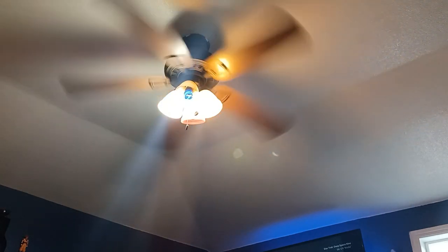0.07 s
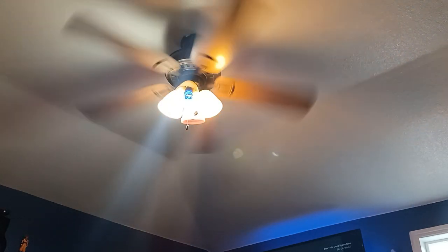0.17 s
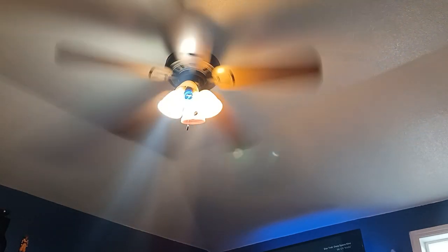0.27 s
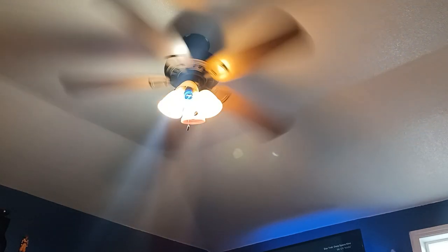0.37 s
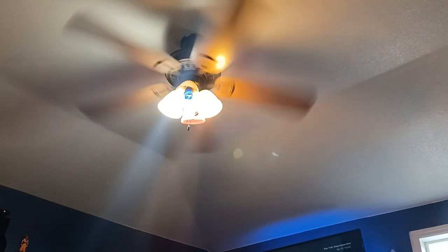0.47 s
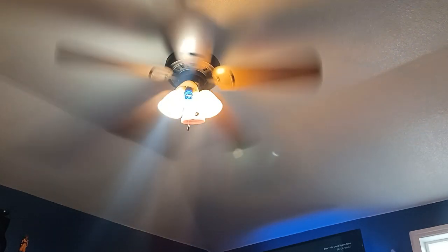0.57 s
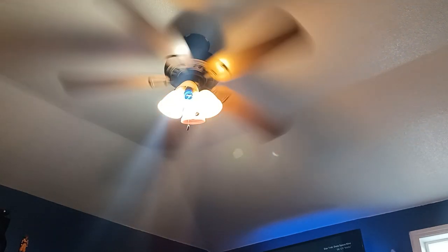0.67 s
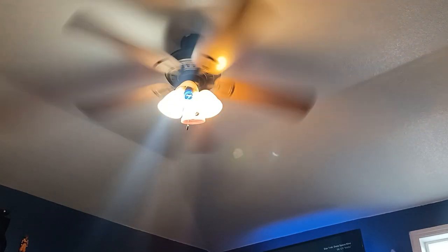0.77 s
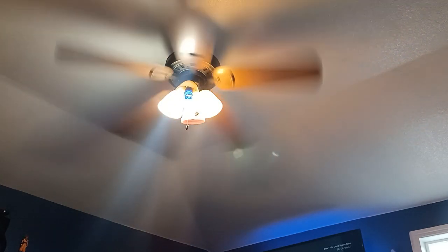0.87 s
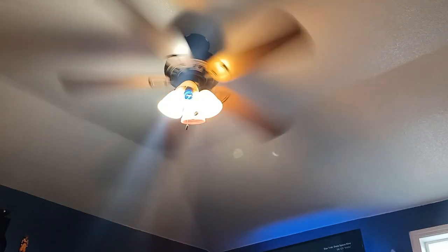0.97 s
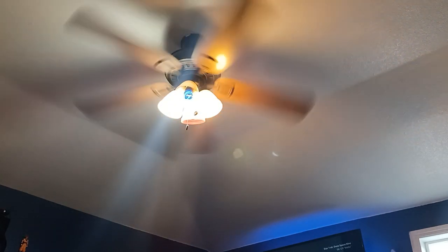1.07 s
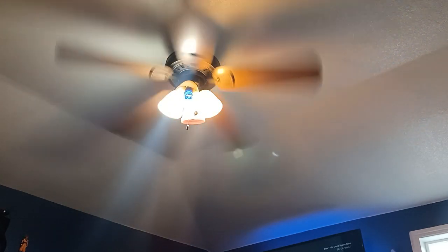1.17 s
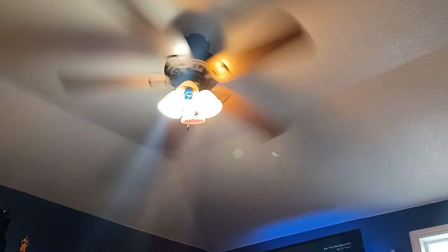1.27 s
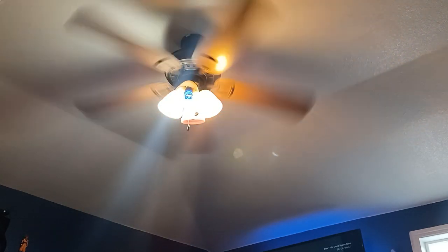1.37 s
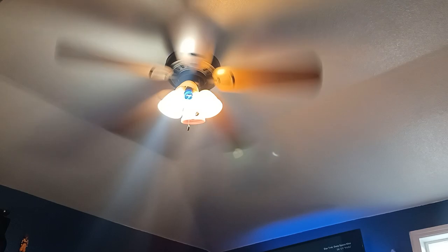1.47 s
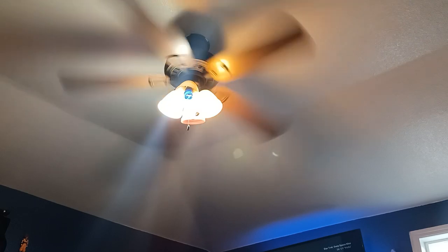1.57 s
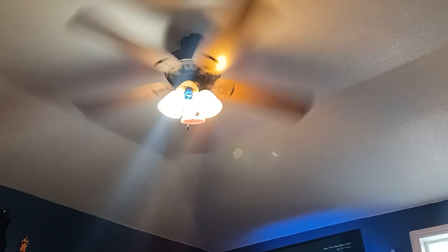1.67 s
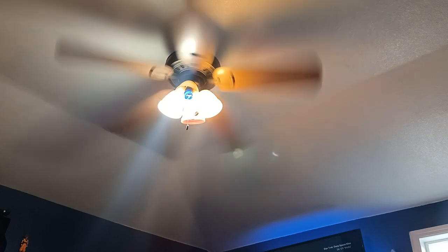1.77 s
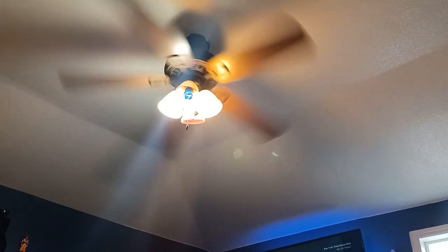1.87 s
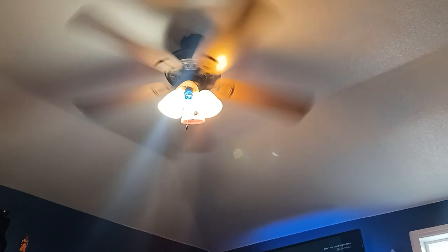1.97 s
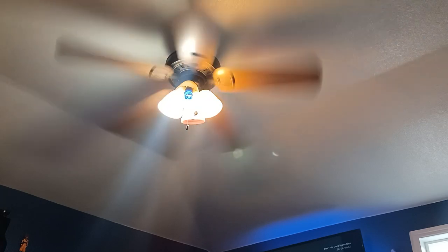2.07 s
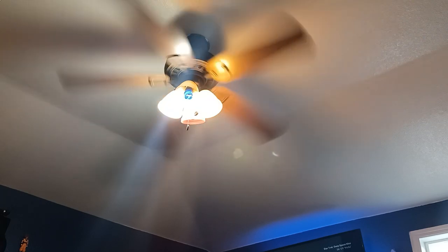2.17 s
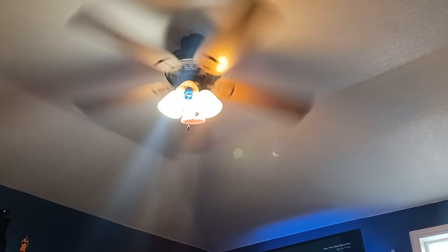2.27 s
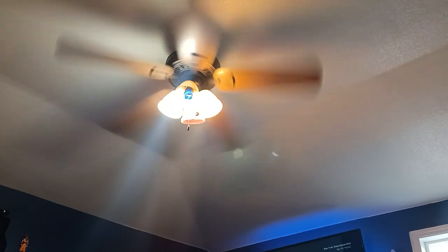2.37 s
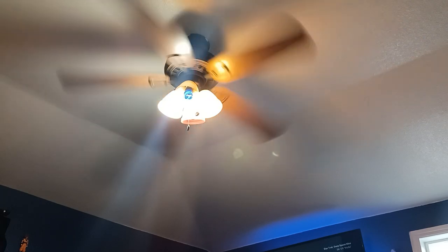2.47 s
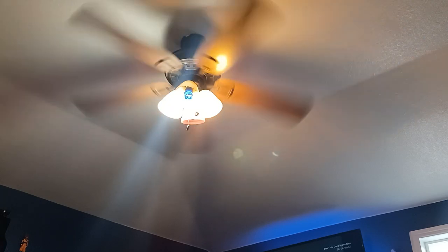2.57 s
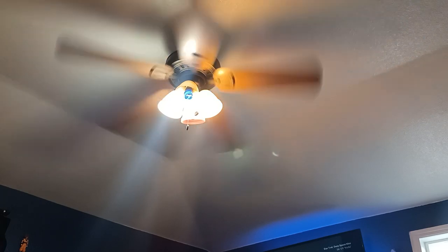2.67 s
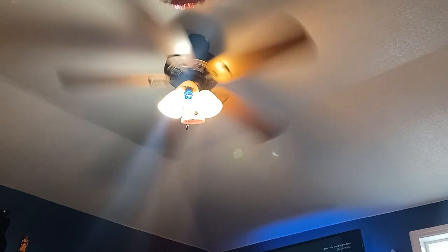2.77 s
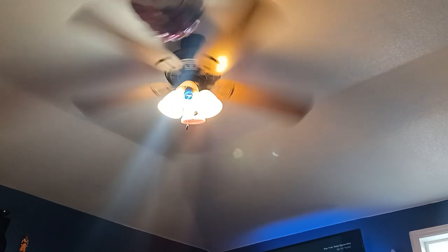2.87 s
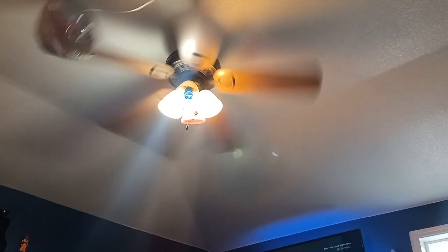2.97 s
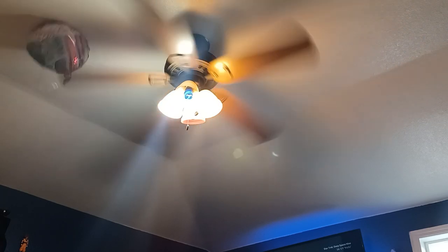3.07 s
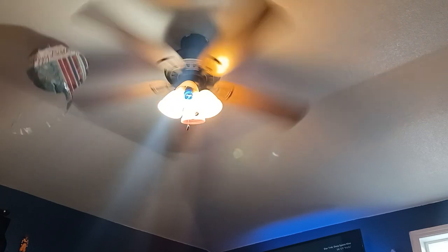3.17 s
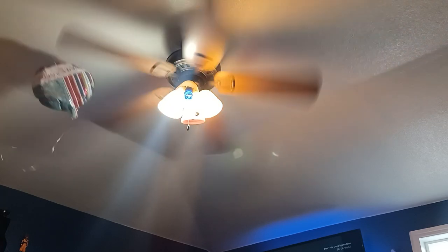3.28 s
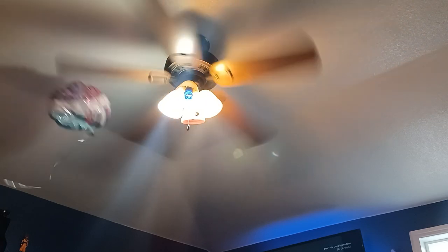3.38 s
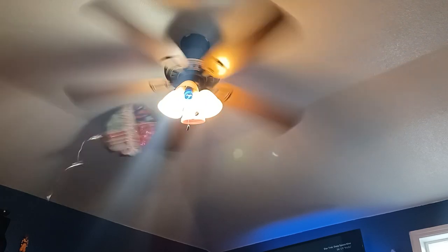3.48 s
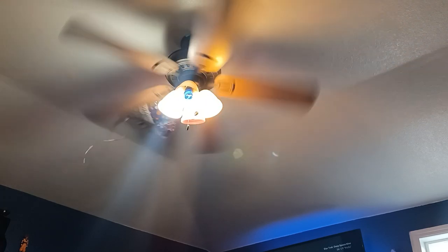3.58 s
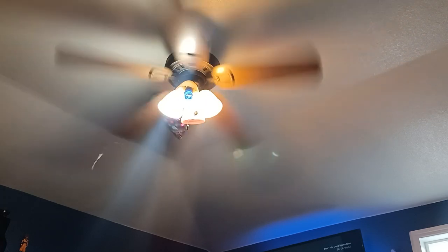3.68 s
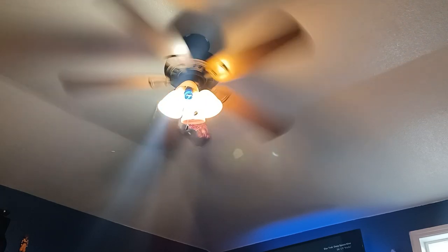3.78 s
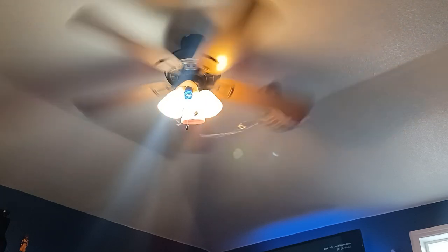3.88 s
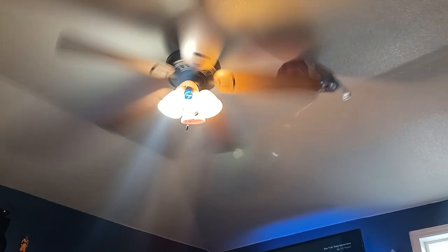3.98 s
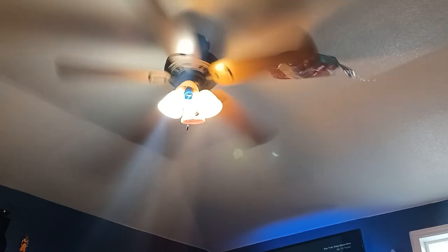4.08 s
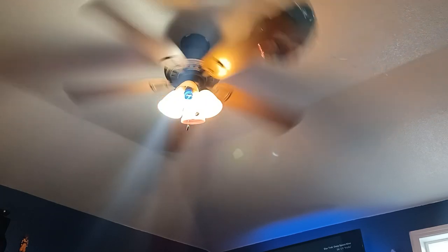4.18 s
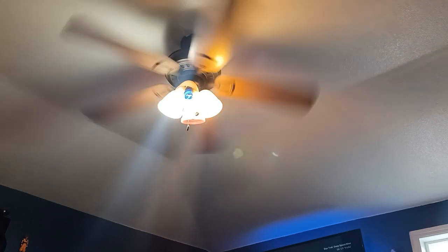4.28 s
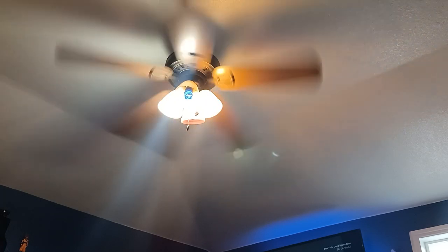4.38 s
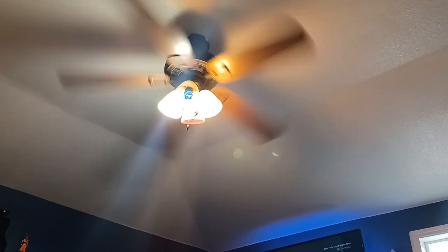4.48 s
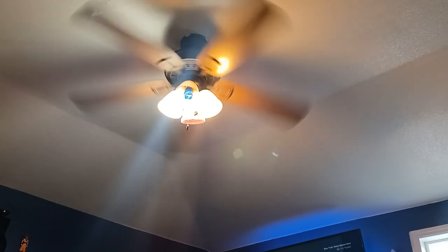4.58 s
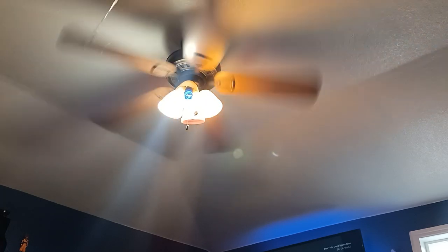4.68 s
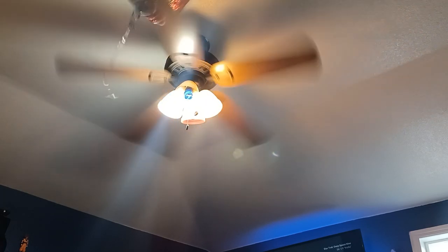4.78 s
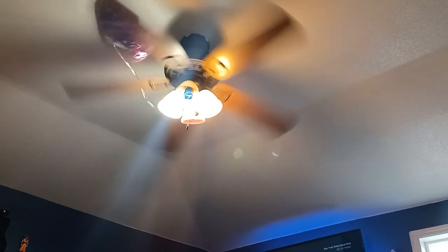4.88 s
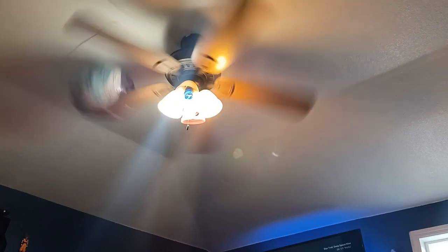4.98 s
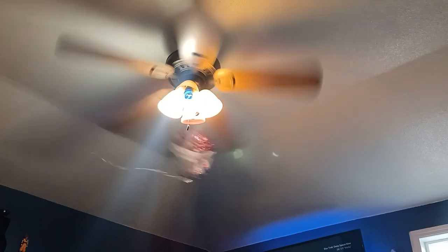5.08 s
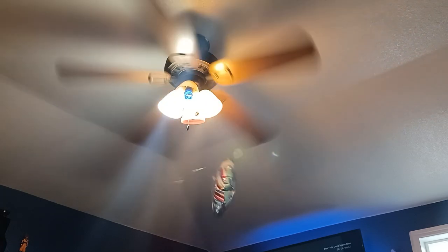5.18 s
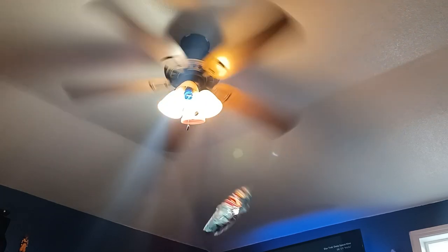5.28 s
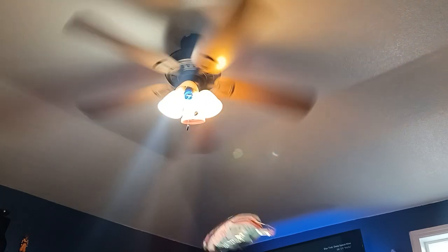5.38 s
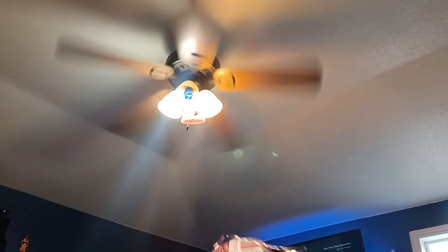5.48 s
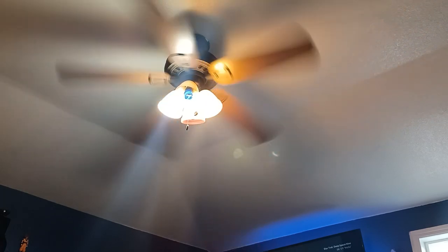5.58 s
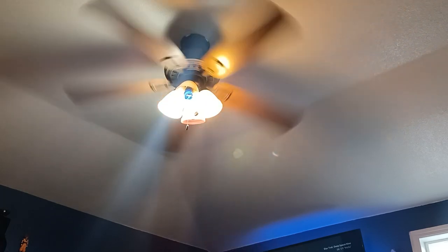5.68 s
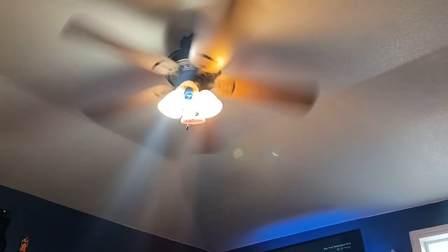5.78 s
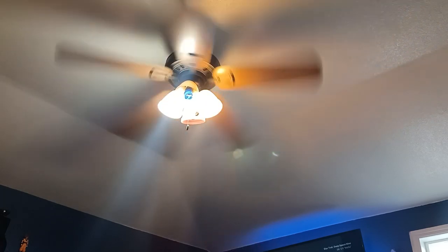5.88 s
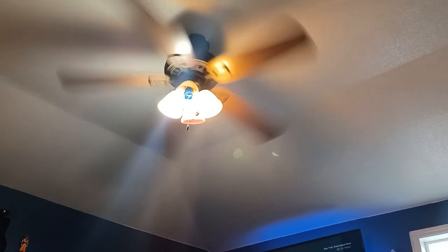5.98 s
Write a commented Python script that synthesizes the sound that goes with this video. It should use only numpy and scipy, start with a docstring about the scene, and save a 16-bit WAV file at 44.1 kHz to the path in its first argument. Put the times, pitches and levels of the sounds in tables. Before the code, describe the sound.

In a bedroom, a foil balloon is handled close to the microphone with soft bumps, light crinkles and small ticks. Just before three seconds the spinning ceiling fan hits it: loud papery smacks with bright crackle and a hollow drum-like ring, in irregular clusters until about five seconds. A last rustle fades, leaving barely audible fan hum and air. The stereo is wide, with a short room echo.

```python
"""A foil balloon rustles as it is handled, then drifts into a spinning ceiling fan in a bedroom.
Each blow, by hand or blade, shakes the skin, sets off a burst of random foil crackle and rings the
resonant modes of the gas cushion. Single creases snap as short rings with bright ticks; dull bumps
are sagging tones in low noise. The motor hums faintly as a tone with narrow noise bands over a rush
of air, and the room answers the balloon with half a second of decaying noise."""
import sys
import numpy as np
from scipy import signal
from scipy.fft import rfft, irfft
from scipy.io import wavfile

SR = 44100
rng = np.random.default_rng(int(sys.argv[2]) if len(sys.argv) > 2 else 0)


def log_audio(samples):
    """Write samples as a 16-bit WAV file to the path given in sys.argv[1]."""
    # one column per channel
    frames = np.atleast_2d(samples).T
    # limit to full scale, then quantise
    limited = np.clip(frames, -1, 1)
    pcm = np.round(limited * 32767).astype(np.int16)
    wavfile.write(sys.argv[1], SR, pcm)


def to_linear_factor(level_db):
    """Convert decibel levels (scalar or array-like) to linear amplitude factors."""
    exponent = np.asarray(level_db, float) / 20
    return 10 ** exponent


N = 266672

# spectrum of creasing foil: (frequency [Hz], density [dB per Hz])
CREASING_FOIL = [(1060, -20.5), (1800, -5.5), (1940, -8.5), (2350, -10), (3030, -12), (5750, -14),
                 (6900, -16.5), (7910, -24.5), (13200, -13.5), (15000, -17), (16000, -53)]
# the balloon is let go near the microphones and rises to the ceiling:
# (time [s], echo send re direct sound [dB], delay of the left microphone [ms])
BALLOON_DISTANCE = [(0, -6, 0.46), (2.2, -2, .3), (2.7, 0.5, 0.17), (4.5, 0, .15), (5.6, -9.5, 0.031)]


def rms_one(x):
    """Normalization: scale to unit mean power."""
    return x / np.sqrt(np.mean(x ** 2) + 1e-20)


def in_time(rows):
    """Linear interpolation: table columns become curves over all samples."""
    times, *columns = np.transpose(rows)
    return [np.interp(np.arange(N) / SR, times, column) for column in columns]


def sides(pan_db):
    """Intensity stereo: left and right gains for a level difference, positive to the left."""
    return to_linear_factor(np.array([[pan_db / 2], [-pan_db / 2]]))


def filtered(x, order, hz, kind):
    """Butterworth filtering: a maximally flat passband."""
    return signal.sosfilt(signal.butter(order, hz, kind, fs=SR, output="sos"), x)


def colour(x, spectrum):
    """Minimum-phase filtering: folding the cepstrum makes a given spectrum causal."""
    table_hz, table_db = np.transpose(spectrum)
    hz = np.maximum(np.fft.rfftfreq(4096, 1 / SR), 10)
    db = np.interp(np.log(hz), np.log(table_hz), table_db)
    cepstrum = irfft(np.log(to_linear_factor(db)))
    cepstrum[1:2048] *= 2
    cepstrum[2049:] = 0
    impulse = irfft(np.exp(rfft(cepstrum)))
    return signal.fftconvolve(x, np.atleast_2d(impulse), axes=1)[:, :N]


def ring(x, hz, t60):
    """Damped resonance: a unit click sets a decaying sine of height 1 ringing."""
    radius = to_linear_factor(-60 / (t60 * SR))
    angle = 2 * np.pi * hz / SR
    return signal.lfilter([0, np.sin(angle)], [1, -2 * radius * np.cos(angle), radius ** 2], x + 1e-18)


def alike_pair(white, alike):
    """Interchannel coherence: left and right from a shared and an opposed noise."""
    alike = np.clip(alike, 0, 1)
    shared = np.sqrt(.5 + alike / 2) * white[0]
    opposed = np.sqrt(.5 - alike / 2) * white[1]
    return shared + opposed * [[1], [-1]]


def fan():
    """Tonal and broadband noise: a steady mains tone and wavering bands over the low rush of air."""
    # motor bands: (frequency [Hz], rms level re the tone [dB], width [Hz])
    motor_bands = [(233.2, -1.5, 2.6), (329, -19.5, 22)]
    # stirred air: (frequency [Hz], density [dB per Hz])
    air_spectrum = [(30, -26.5), (70, -13), (170, -8), (230, -4.5), (400, -10.5), (650, -20.5),
                    (1000, -20.5), (2000, -29.5), (2800, -43), (6400, -35.5), (8000, -43), (15200, -44.5),
                    (16200, -74.5)]
    # the hum sinks while the blows last and all of it fades at the end:
    # (time [s], hum gain [dB], air gain [dB])
    fan_levels = [(0, -57, -55.5), (1.0, -59, -60), (2.8, -60, -54.5), (3.2, -68, -54.5), (5.3, -63.5, -57),
                  (5.6, -68.5, -65), (6.05, -68, -71)]
    mains_hz, split_hz, treble_gain_db = 121, 700, -2.5
    hum_db, air_db = in_time(fan_levels)

    white = rng.standard_normal((len(motor_bands), N + SR))   # the first second lets the bands build up
    tone = np.sqrt(2) * np.sin(2 * np.pi * mains_hz * np.arange(N) / SR)
    bands = sum(to_linear_factor(db) * rms_one(ring(noise, hz, 2 / width)[SR:])
                for noise, (hz, db, width) in zip(white, motor_bands))
    hum = (tone + bands) * sides(-3.0)

    low = colour(rng.standard_normal((2, N)), air_spectrum)
    high = colour(rng.standard_normal((2, N)), air_spectrum)
    low = filtered(alike_pair(low, 0.29), 2, split_hz, "low")
    high = filtered(alike_pair(high, 0.21), 2, split_hz, "high")
    air = (low + to_linear_factor(treble_gain_db) * high) / np.std(low)
    return to_linear_factor(hum_db) * hum + to_linear_factor(air_db) * air


def echo_tail():
    """Diffuse reverberation: noise dying band by band, alike in the bass and unrelated in the treble."""
    # (frequency [Hz], t60 [s], left-right likeness, left-right level difference [dB])
    room_bands = [(101, 0.43, 0.81, -5), (292, 0.18, 0.9, -3.5), (900, 0.31, 0.21, 4),
                  (2417, 0.4, 0.088, 3.5), (7040, 0.45, 0.081, -3), (14000, 0.33, 0.054, -2.5)]
    first_echo_s = 0.0057   # silent until then, full after twice that time
    t, tail = np.arange(SR // 2) / SR, 0
    hz = [row[0] for row in room_bands]
    edges = [20, *np.sqrt(np.multiply(hz[1:], hz[:-1])), 19000]
    for low, high, (_, t60, alike, pan_db) in zip(edges, edges[1:], room_bands):
        white = rng.standard_normal((2, len(t)))
        band = filtered(white, 2, [low, high], "band")
        band = alike_pair(band, alike) * sides(pan_db)
        equal_energy = np.sqrt(t60 * SR / np.log(1e6))   # long decays gain no extra energy
        tail = tail + band * to_linear_factor(-60 * t / t60) / equal_energy
    return tail * np.clip(t / first_echo_s - 1, 0, 1)


def room(x):
    """Time-varying convolution: the balloon keeps moving, so the echo pattern changes in steps."""
    count, place_s = 8, .1   # echo patterns taken in turn, time in one place
    sent = to_linear_factor(in_time(BALLOON_DISTANCE)[0]) * x.mean(axis=0)
    place = (np.arange(N) / SR / place_s).astype(int) % count
    return sum(signal.fftconvolve((sent * (place == k))[None], echo_tail(), axes=1)[:, :N]
               for k in range(count))


def thuds():
    """Frequency glide: soft low bumps, each a sagging tone inside a puff of low noise."""
    # (time [s], tone level before decay [dB], first frequency [Hz], last frequency [Hz], t60 [s])
    bumps = [(0.094, -40, 152, 80, 0.23), (0.224, -33.5, 177, 80, 0.13), (1.063, -39, 196.5, 73, 0.38),
             (3.46, -26, 96, 71, 0.089), (4.171, -40.5, 110, 60, 0.076)]
    sag_s, attack_s = 0.022, 0.0056   # time constants
    out, t = np.zeros(N), np.arange(N) / SR
    puff = rms_one(filtered(rng.standard_normal(N), 2, [55, 240], "band"))
    for start, db, first_hz, last_hz, t60 in bumps:
        since = np.maximum(t - start, 0)
        hz = last_hz + (first_hz - last_hz) * np.exp(-since / sag_s)
        shape = (1 - np.exp(-since / attack_s)) * to_linear_factor(db - 60 * since / t60)
        tone = np.sin(2 * np.pi * np.cumsum(hz * (since > 0)) / SR)
        out += shape * (tone + .6 * puff)
    return out


def snaps():
    """Impulse response: a crease flips and gives a ring of a few cycles and a bright tick."""
    # (time [s], ring level before filter and panning [dB], pitch [Hz], tick peak [dB])
    flips = [(0.355, -36, 1800, -19.5), (0.819, -26, 1510, -57), (0.936, -38, 1580, -68),
             (1.051, -52, 1200, -41), (1.07, -54, 900, -30.5), (1.119, -55, 1110, -44),
             (1.234, -22, 2350, -26), (1.368, -31.5, 2460, -21), (1.374, -46, 800, -18),
             (1.382, -39, 1950, -36), (1.4, -35, 1510, -17.5), (1.435, -49, 1260, -34),
             (1.457, -26, 1970, -27.5), (1.532, -42, 1410, -41), (1.892, -23, 1520, -31.5),
             (2.047, -14, 2320, -16), (2.866, -2, 1120, -13), (2.935, -1, 1150, -19),
             (2.942, -2.5, 1140, -12), (2.956, -17, 1680, -21.5), (3.281, -40.5, 1390, -31),
             (3.352, -0.5, 925, -11), (3.431, -7, 990, -13), (3.441, -8, 900, -17.5), (3.45, -6, 1530, -14),
             (3.816, -0.5, 780, -21.5), (3.998, -8, 1100, -17), (4.176, 4.5, 1500, -18),
             (4.564, -45, 1880, -34), (4.644, -29, 1340, -35), (4.706, -23.5, 1040, -27.5),
             (4.728, -25, 1380, -27), (4.924, -3, 810, -15)]
    length = 2048   # samples
    rings, ticks, click = np.zeros(N), np.zeros(N), np.eye(1, N)
    tick = filtered(colour(click, CREASING_FOIL), 2, 3500, "high")[0, :length]
    tick = tick / np.abs(tick).max()
    for s, db, hz, tick_db in flips:
        at = round(s * SR)
        rings[at:at + length] += to_linear_factor(db) * ring(click[0, :length], hz, 4 / hz)   # 60 dB in four cycles
        ticks[at:at + length] += to_linear_factor(tick_db) * tick
    rings = filtered(rings, 2, 400, "high")
    return sides(11.0) * rings + ticks


def grains(per_s, spread_db):
    """Random impulse process: clicks of very uneven size, of power 1 however sparse they come."""
    sizes = rms_one(to_linear_factor(spread_db * np.minimum(rng.exponential(1, N), 5)))
    signed = sizes * rng.choice([-1, 1], N)
    chance = np.minimum(per_s / SR, 1)
    return (signed * (rng.random(N) < chance) / np.sqrt(chance))[None]


def foil(skin, crackle, body, per_s, fine_per_s, spread_db):
    """Crackling noise: coarse buckles shake the skin, fine creases crackle all over it."""
    alike = 0.08   # each microphone hears only this share of the other's creases
    coarse = rms_one(colour(grains(per_s, spread_db), body))
    creases = np.vstack([grains(fine_per_s, spread_db) for side in "LR"])
    fine = rms_one(colour(creases + alike * creases[::-1], CREASING_FOIL))
    return skin * coarse + crackle * fine


def rustle():
    """Crackling at low drive: the gentler the creasing, the more it falls apart into single ticks."""
    # foil in hands or draught: (start [s], swell [s], peak level before panning [dB], fading t60 [s])
    handling = [(0.171, 0.063, -33.5, 0.62), (.48, 0.019, -54, 0.72), (.9, 0.043, -71, .6),
                (1.041, 0.051, -58, 0.33), (1.198, 0.12, -37, 0.068), (1.36, 0.031, -46, 0.32),
                (1.86, 0.032, -52.5, .3), (1.889, 0.16, -38.5, 0.37), (2.45, 0.33, -70.5, 0.9),
                (4.4, 0.0099, -45.5, 0.31), (4.589, 0.17, -40.5, 0.16), (5.0, 0.14, -37.5, 0.34),
                (5.15, 0.03, -32, .24), (5.33, .22, -72, .3)]
    # skin under the fingers: (frequency [Hz], density [dB per Hz])
    slack_skin = [(120, -20.5), (250, 0.5), (600, -4), (1200, -4), (2000, -13.5), (3100, -25.5),
                  (4200, -23), (6000, -31)]
    swell_db = 10      # a rustle sets in this far under its peak and rounds off towards it
    dense_db = -40.5   # rustle level at which the creases run together
    slack_db, slack_follows = -43.5, 0.79   # skin level at that density, share of the crackle's swing
    crackle, t = np.zeros(N), np.arange(N) / SR
    for start, swell, db, t60 in handling:
        since_peak = t - start - swell
        rising_db = -swell_db * (since_peak / swell) ** 2
        under_db = np.where(since_peak < 0, rising_db, -60 * since_peak / t60)
        crackle = np.maximum(crackle, (t >= start) * to_linear_factor(db + np.minimum(under_db, 0)))
    dense = crackle / to_linear_factor(dense_db)
    skin = to_linear_factor(slack_db) * dense ** slack_follows
    fine_per_s = 7400.0 * np.clip(dense, .12, 1)
    return foil(skin * sides(8.2), crackle * sides(0.24), slack_skin, 1500., fine_per_s, 2.93)


def blows():
    """Forced vibration: each blow swells in a few ms and crumples out; the gas cushion rings with it."""
    # two by hand, then by the blades: (time near full swell [s], skin level before panning [dB],
    # crackle re skin [dB], push on the gas re skin [dB], crumpling t60 [s])
    knocks = [(0.078, -44, -19, -48, 0.2), (0.82, -42, -16.5, -55, 0.32), (2.705, -42, 0.5, -42, 0.67),
              (2.856, -14, 0, -48, .17), (2.93, -16, -3.5, -33, 0.39), (3.359, -12.5, 0.5, -26, 0.088),
              (3.433, -15.5, -2.5, -35, 0.32), (3.729, -25, -1, -37, 0.21), (3.812, -17, -4.5, -30, 0.34),
              (3.997, -20.5, 0.5, -46.5, 0.16), (4.167, -14, -6, -23.5, 0.26), (4.316, -39.5, 5, -44, 0.24),
              (4.596, -42.5, 4, -34, 0.07), (4.706, -43, -5, -34, 0.14), (4.813, -20.5, -0.5, -35.5, 0.22),
              (4.907, -12.5, -5, -29, 0.35), (5.165, -26.5, -14.5, -30.5, 0.096)]
    # gas cushion modes: (frequency [Hz], gain [dB], t60 [s])
    cushion_modes = [(228, 5, .3), (282, -4, .1), (385, -8, .07), (540, -7, .08), (150, -12, .08)]
    # taut skin under a blow: (frequency [Hz], density [dB per Hz])
    taut_skin = [(120, -24), (185, -12), (235, -3.5), (350, -6), (500, -3.5), (800, -8), (1300, -7),
                 (2000, -14.5), (2500, -22.5), (4000, -24), (8000, -60.5)]
    # a hard blow dents deeper and swells longer: swell at the hard level [s], share of level, hard level [dB]
    rise_s, rise_follows, hard_db = 0.013, .3, -14
    buckles_per_s, creases_per_s, uneven_db = 1600, 12000, 3.8
    skin, crackle, boom, t = np.zeros(N), np.zeros(N), np.zeros(N), np.arange(N) / SR
    for s, db, crackle_db, boom_db, t60 in knocks:
        rise = rise_s * to_linear_factor(rise_follows * (db - hard_db))
        since = np.maximum(t - s + rise, 0)
        shape = (1 - np.exp(-(since / rise) ** 2)) * to_linear_factor(db - 60 * since / t60)
        skin += shape
        crackle += shape * to_linear_factor(crackle_db)
        boom += shape ** 2 * to_linear_factor(boom_db - db)   # the push on the gas dies twice as fast

    push = rng.standard_normal((len(cushion_modes), N))
    cushion = sum(to_linear_factor(db) * ring(boom * noise, hz, t60)
                  for noise, (hz, db, t60) in zip(push, cushion_modes))
    # the struck skin is louder on the left
    struck = foil(skin * sides(9.5), crackle * sides(-.8), taut_skin,
                  buckles_per_s, creases_per_s, uneven_db)
    return struck + cushion * sides(2.5)


def scene():
    """Superposition and arrival-time difference: balloon sound reaches the right microphone first."""
    snap_echo_db = -8   # snaps beam at the listener and stir the room less
    body, sharp = blows() + rustle() + thuds(), snaps()
    balloon, samples = body + sharp, np.arange(N)
    late = np.round(in_time(BALLOON_DISTANCE)[1] * SR / 1000).astype(int)
    direct = np.array([balloon[0, np.maximum(samples - late, 0)], balloon[1]])
    return direct + room(body + to_linear_factor(snap_echo_db) * sharp) + fan()


def top_cut(x):
    """Nothing passes above the cut-off."""
    return signal.sosfilt(signal.butter(12, 16970, fs=SR, output="sos"), x)


def record(dry):
    """Close microphones and saturation: little deep bass, lows alike, only the highest peaks rounded."""
    mid = dry.mean(axis=0)
    close = mid + filtered(dry - mid, 1, 170, "high")   # long waves reach both microphones alike
    thin = filtered(close, 3, 62, "high")   # small microphones miss the deepest bass
    rounded = thin / (1 + thin ** 4) ** .25
    return top_cut(rounded)


dry = scene()
out = record(dry)
log_audio(out)
```